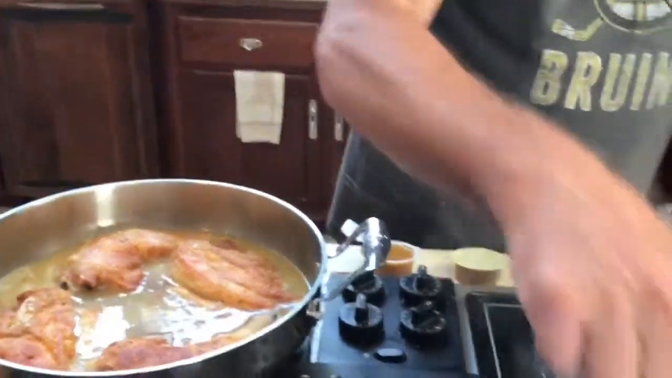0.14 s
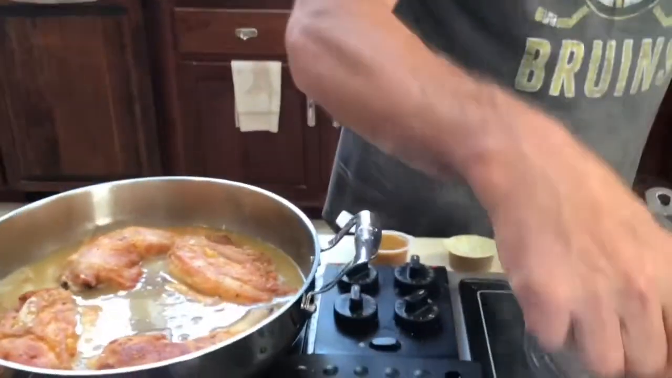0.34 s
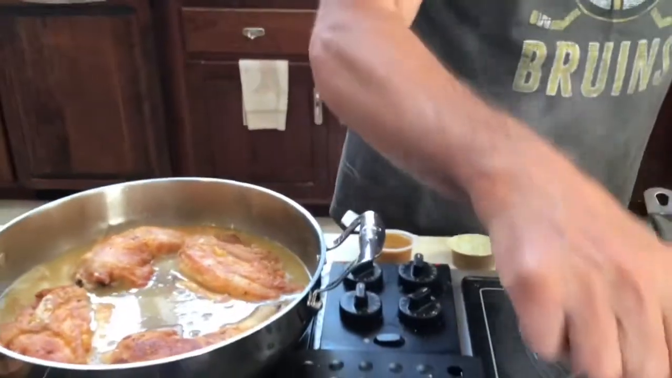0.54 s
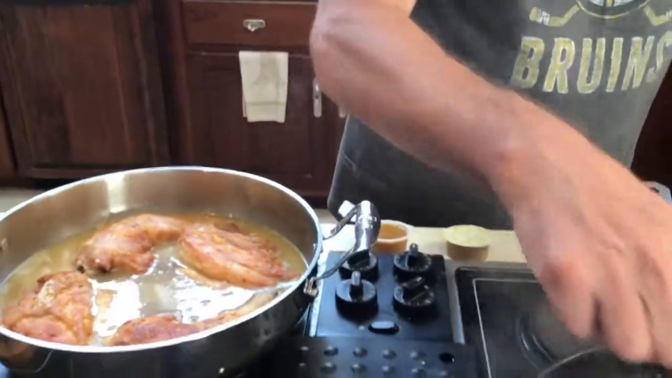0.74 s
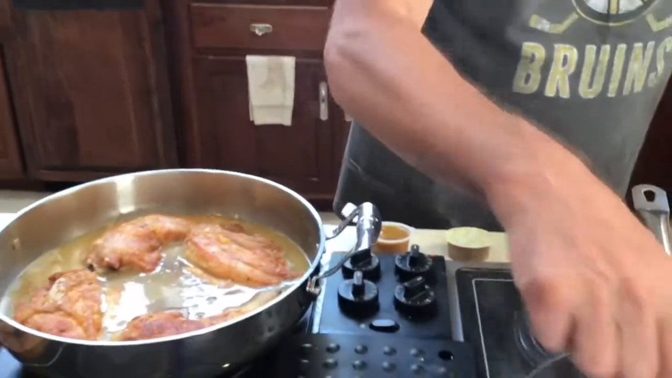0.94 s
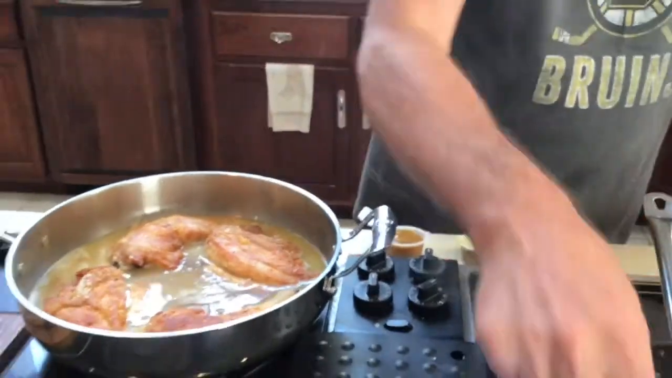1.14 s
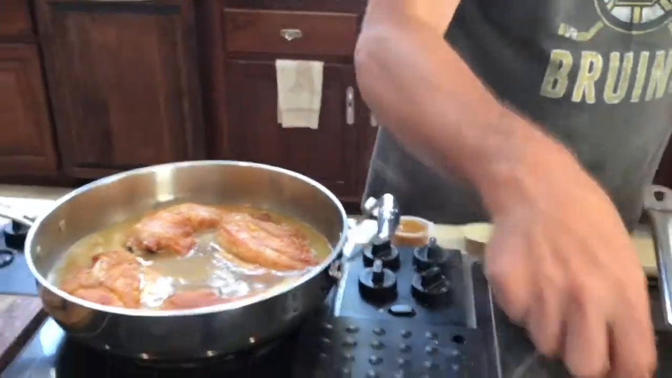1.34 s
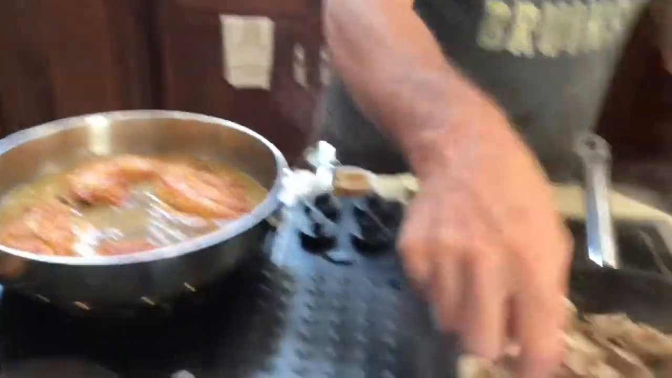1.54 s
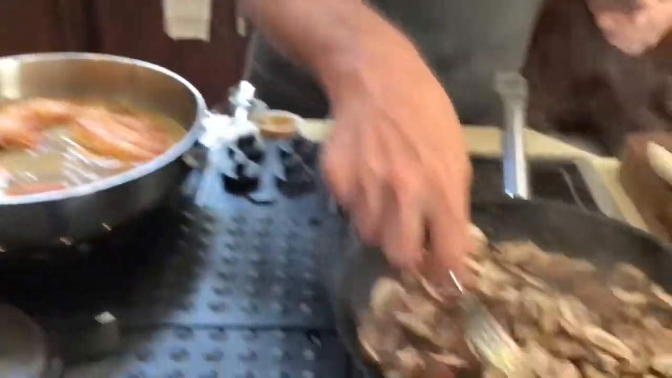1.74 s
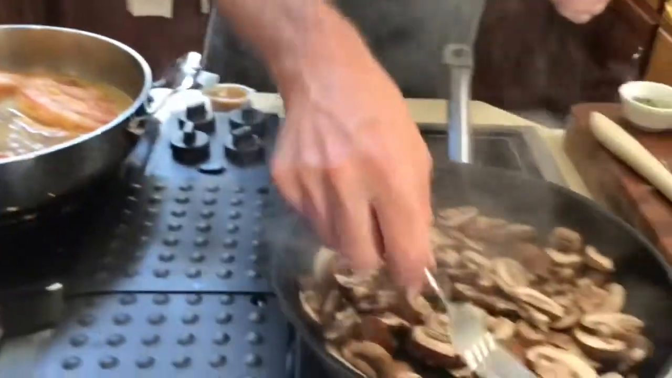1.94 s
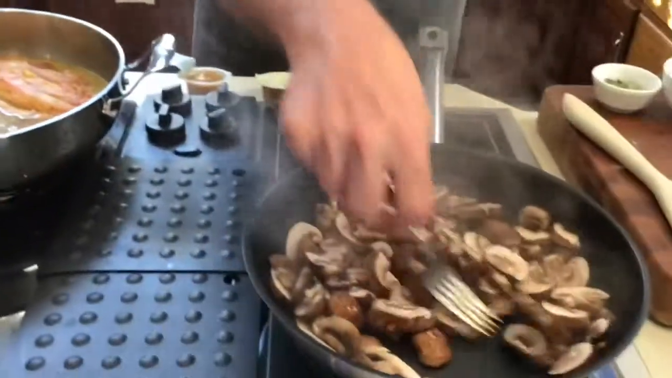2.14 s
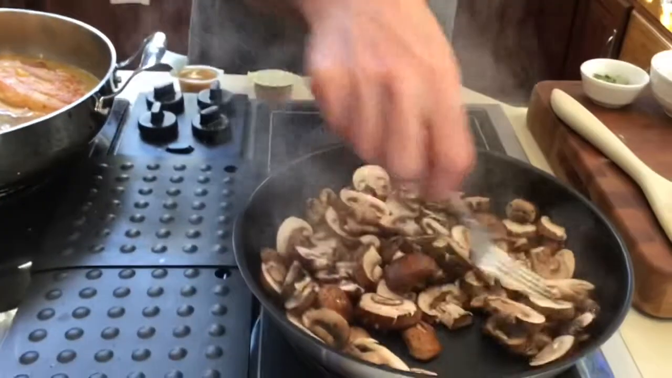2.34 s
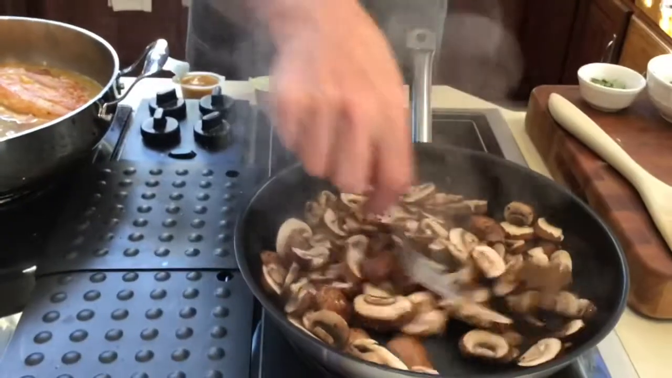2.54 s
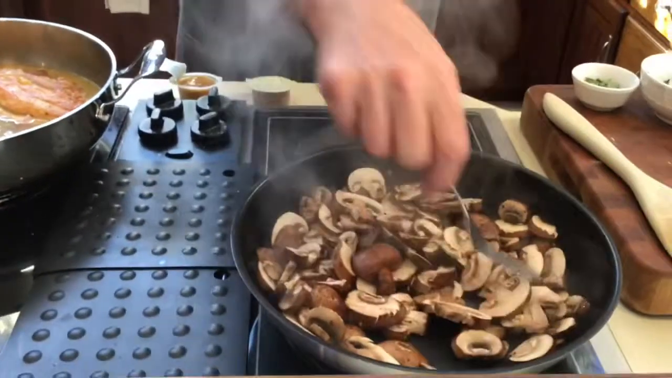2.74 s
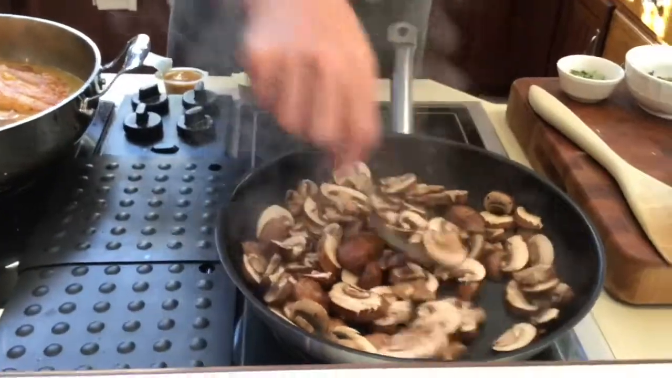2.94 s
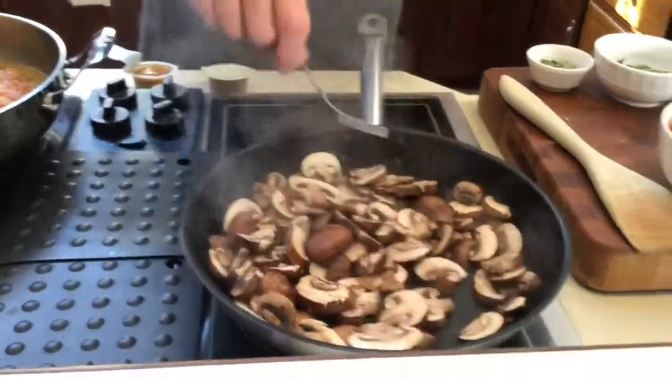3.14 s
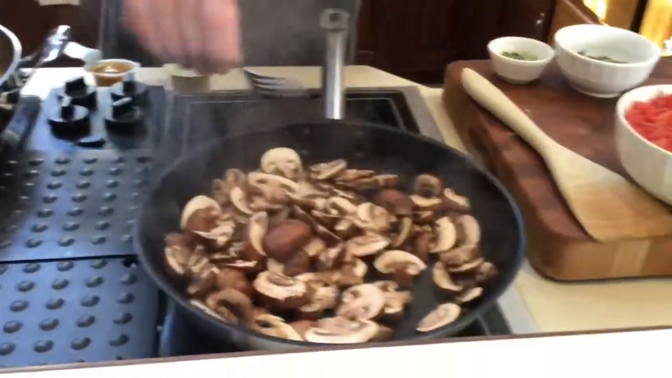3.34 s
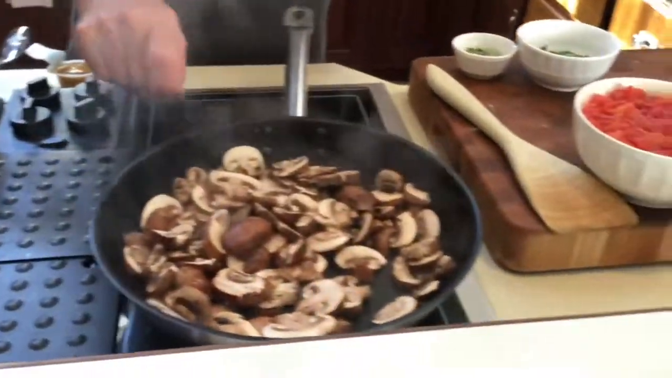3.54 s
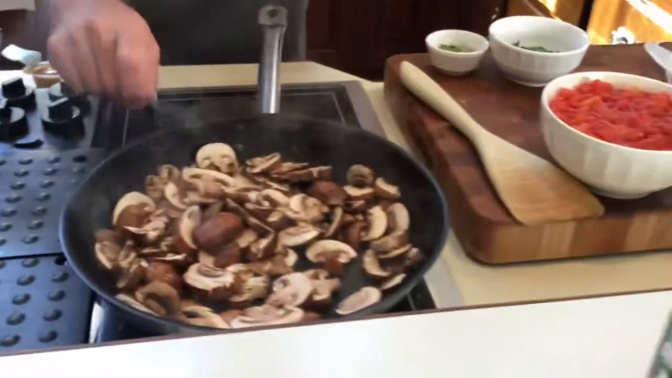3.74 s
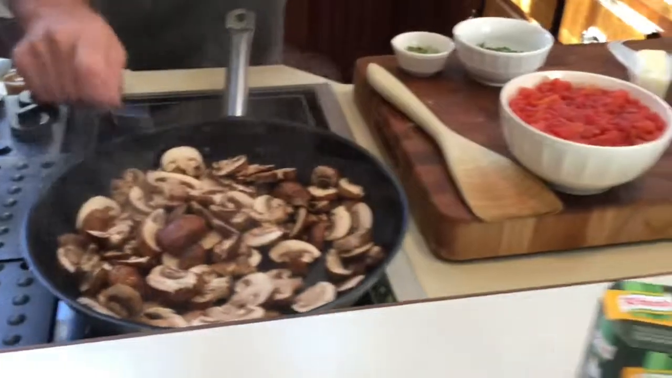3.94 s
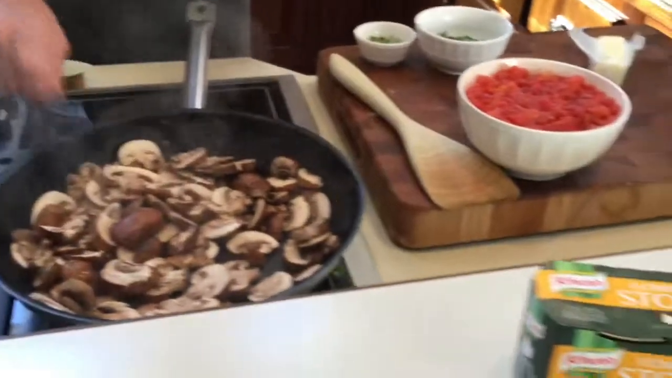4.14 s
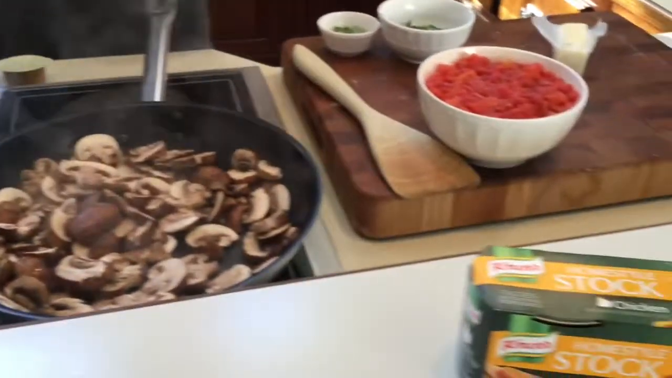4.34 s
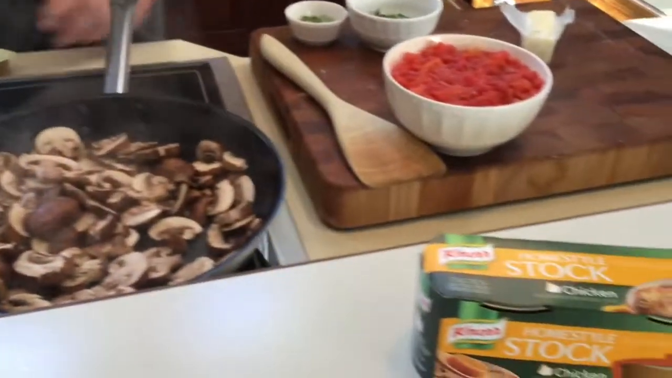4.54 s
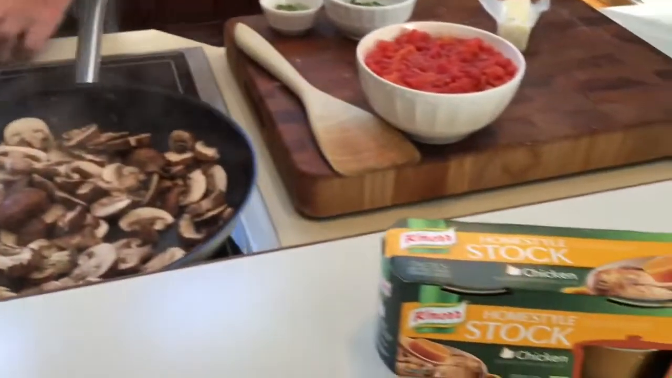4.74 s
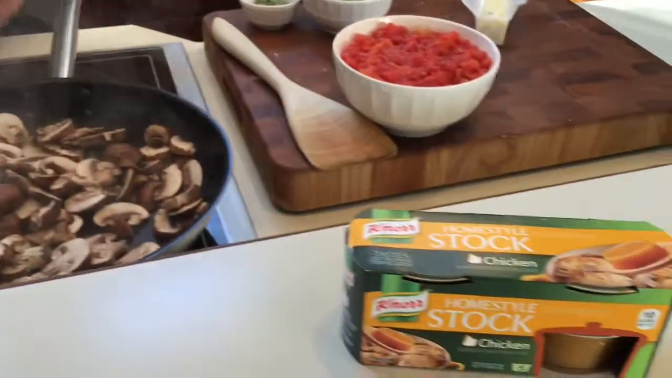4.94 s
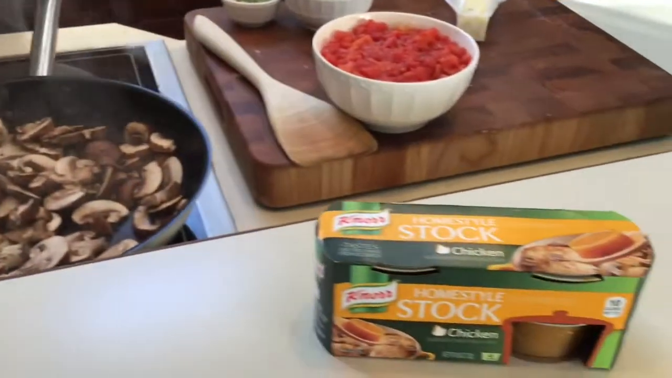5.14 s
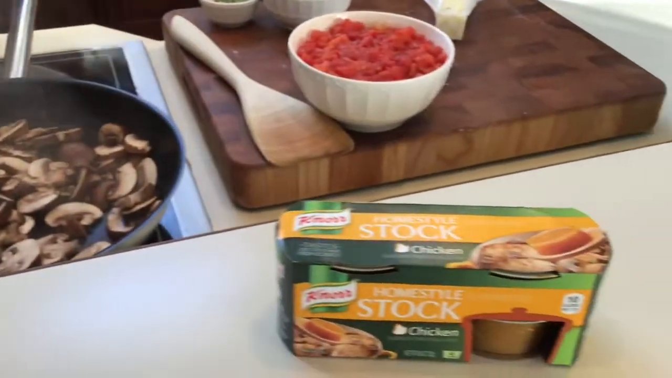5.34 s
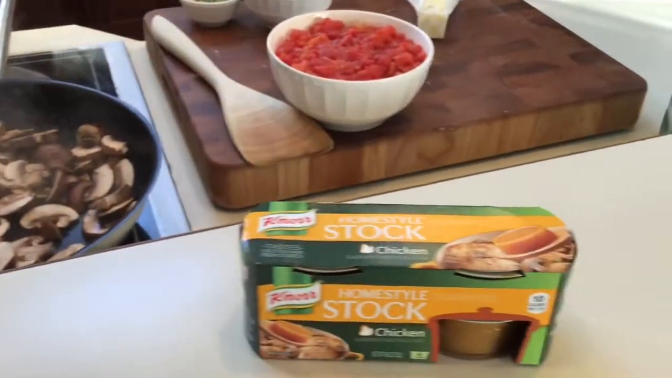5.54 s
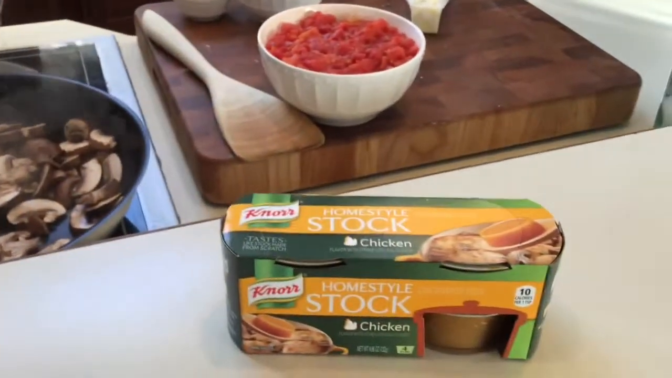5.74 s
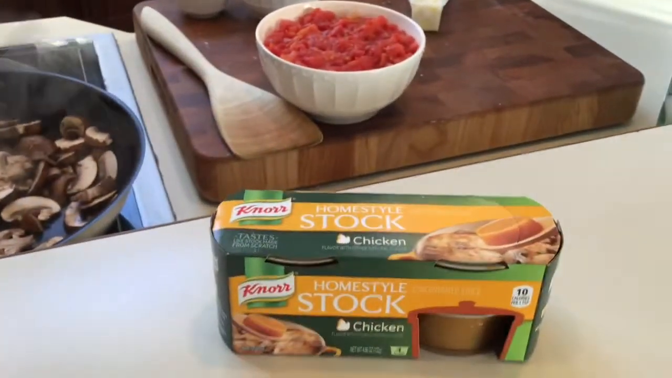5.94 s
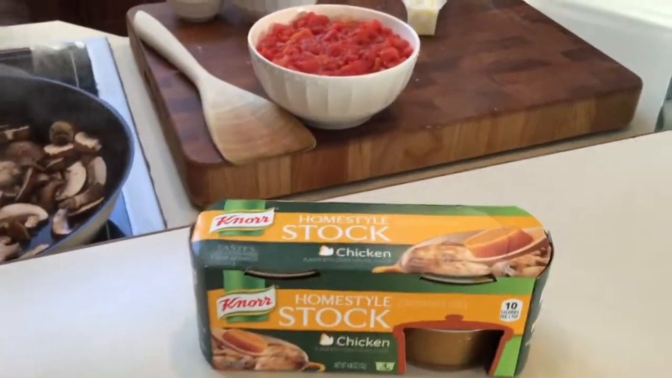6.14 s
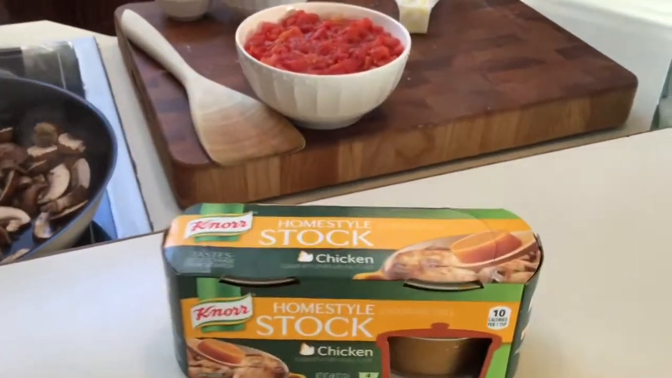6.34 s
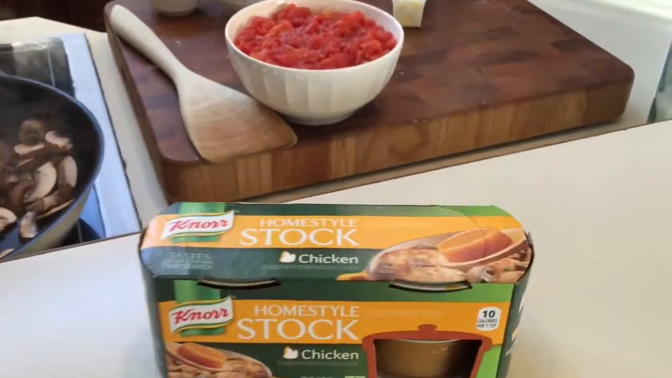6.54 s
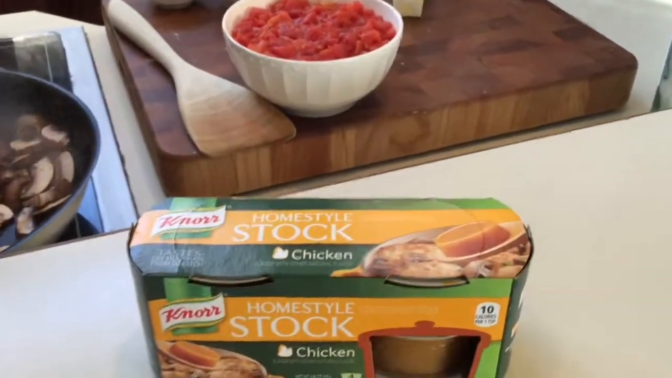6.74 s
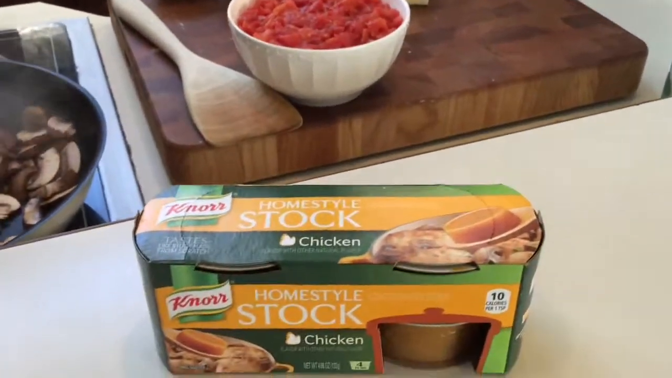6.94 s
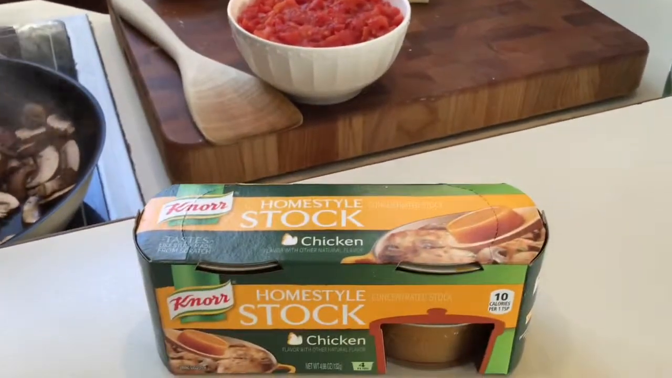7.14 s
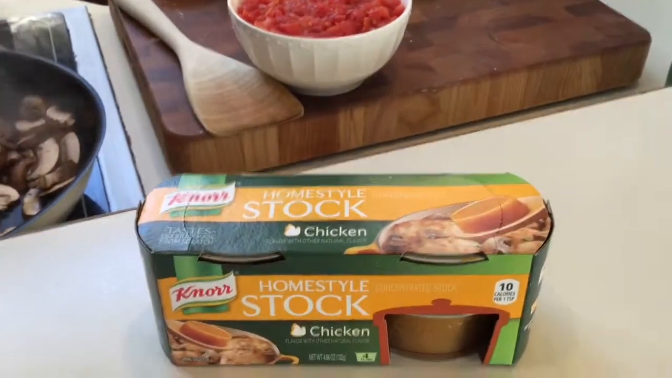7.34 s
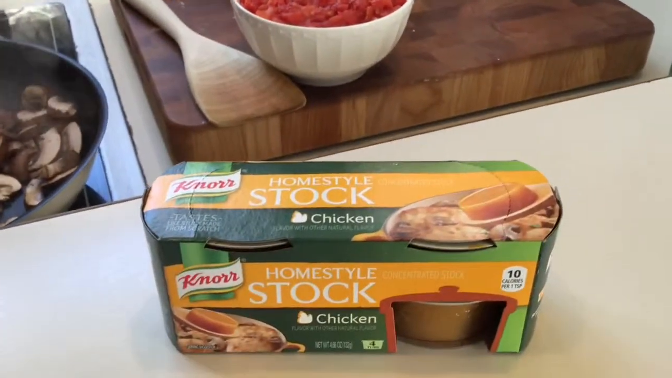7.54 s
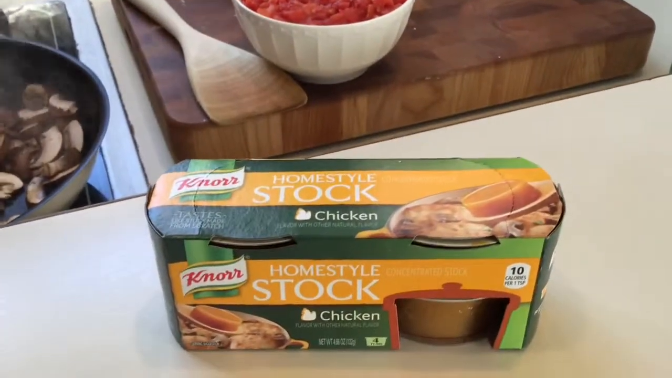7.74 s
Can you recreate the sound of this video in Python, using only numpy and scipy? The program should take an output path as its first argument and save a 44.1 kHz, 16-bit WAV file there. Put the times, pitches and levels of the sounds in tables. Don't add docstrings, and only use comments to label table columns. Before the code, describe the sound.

Mushrooms sizzle and spit in a frying pan, gradually receding, with four sharp ringing fork knocks on the rim midway and faint floor creaks.

```python
import sys
import numpy as np
from scipy import signal
from scipy.io import wavfile
from scipy.ndimage import uniform_filter1d

SR = 44100
rng = np.random.default_rng(int(sys.argv[2]) if len(sys.argv) > 2 else 0)


def store_pcm(level_fs):
    pcm = np.round(np.clip(level_fs, -1, 1) * 32767).astype(np.int16)
    wavfile.write(sys.argv[1], SR, np.atleast_2d(pcm).T)


def convert_level_to_amplitude(level_db):
    exponent = np.asarray(level_db, float) / 20
    return 10 ** exponent


N = 348390
TIME = np.arange(N) / SR

# [t/s, level/dB]
FRYING_LEVEL = [(0, -34.5), (.54, -35), (.8, -36.5), (1.36, -37.5), (1.6, -38.5), (2.0, -38.5),
                (2.4, -38.5), (2.8, -38.5), (3.5, -41), (4.4, -43), (5.0, -44), (5.7, -44.5), (6.2, -45),
                (7.9, -45)]
# [f/Hz, level per Hz/dB]
FIZZ_COLOUR = [(290, -55), (500, -20), (562, -14), (659, -14.5), (708, -17.5), (1020, -13.5), (1090, -11.5),
               (1530, -8.5), (4730, -6), (7100, -3.5), (8090, -1.5), (8960, -1), (11800, -15), (15100, -23),
               (16000, -20)]
# [level when near/dB, share of the fading it follows]
FIZZ_ZONES = [(11.5, 0.82), (14.5, 0.97), (15, 1), (16, 1.01), (18.5, 0.59)]
# [f/Hz, level per Hz/dB]
HUM_COLOUR = [(18, -34), (30, -8.5), (52, -18), (86, -6.5), (178, 0), (276, -6), (337, -3.5), (394, -7.5),
              (509, -13.5), (563, -14.5), (900, -25.5), (1170, -48), (1980, -120)]
# [level at rest/dB, swell/dB, centre t/s, width/s]
DRONE_SWELL = (-76.5, 5, 6.9, 1.5)
# [t/s, peak level/dB, wet part level/dB]
FAT_SPITS = [(0.1301, -18, -28), (0.184, -20, -15), (0.5025, -8, -15), (0.5804, -13.5, -17),
             (0.6784, -25, -19), (0.7064, -13, -19), (0.7417, -22, -17), (0.7633, -16, -24),
             (0.7875, -15, -19), (0.8114, -17.5, -22), (0.8704, -16, -28), (0.9825, -14, -5),
             (1.2774, -19, -16), (1.2925, -20, -21), (1.558, -17, -19), (1.863, -19, -11),
             (1.9634, -18, -19), (2.3214, -16, -19), (2.7938, -15, -26), (3.2555, -18, -24),
             (3.399, -15.5, -19), (4.5063, -26, -26), (5.2774, -22.5, -13), (5.681, -23, -27),
             (5.7195, -22, -13), (6.5184, -25, -19), (6.7244, -39, -19), (6.8753, -26, -19),
             (7.6226, -28, -11), (7.7284, -34, -19)]
# [t/s, hold/s, level/dB]
BOARD_RUBS = [
    (1.316, 0.043, -48.5),
    (1.44, 0.018, -53.5),
    (1.55, .02, -61),
    (1.7, 0.13, -54.5),
    (1.747, 0.017, -60),
    (5.313, 0.054, -46),
    (5.414, 0.013, -50),
    (5.496, 0.06, -48.5),
    (5.697, 0.1, -48),
]
# [f/Hz, width/Hz, level/dB]
BOARD_MODES = [(125, 18, -9), (183, 16, 0), (243, 22, -3), (290, 30, -9)]
# [t/s, hold/s, level/dB]
FLOOR_GROAN = (3.11, 0.076, -53)
# [t/s, level/dB, f/Hz, t60/s]
SOFT_THUMPS = [
    (0.47, -47, 80, .08),
    (1.738, -39, 780, 0.018),
    (1.74, -45, 158, 0.2),
    (1.742, -48, 443, 0.095),
]
# [t/s, level/dB, f/Hz, t60/s]
WET_POPS = [
    (6.655, -37, 3300, .02),
    (6.725, -36, 3270, .02),
    (7.626, -34, 2280, 0.0095),
    (7.731, -37, 3250, .02),
    (7.731, -38, 2600, .015),
    (7.757, -35, 3000, .012),
    (6.837, -40, 3600, .012),
]
KNOCK_TIMES = [3.5385, 3.7376, 3.9265, 4.1366]
# [peak level/dB, clatter t60/s, chatter length/s, thud level/dB, deep push level/dB]
KNOCK_BLOWS = [
    (-3.5, 0.069, 0.0027, -6, -39),
    (-5.5, 0.079, 0.0053, -11, -43),
    (-5.5, 0.075, 0.0029, -11, -56),
    (-5.5, 0.065, 0.014, -10, -57),
]
# [f/Hz, level per Hz/dB]
CLATTER_COLOURS = [
    [(88, -26), (150, -4), (774, -14), (1060, 0.5), (1480, -10), (1660, 12), (1940, -24), (2180, -2),
     (2810, -1.5), (4410, -18.5), (5570, 0), (6140, -9), (8900, 2.5), (16000, -24)],
    [(88, -32), (150, -18), (601, -2.5), (1480, -7), (1720, -4), (3840, -18.5), (4580, -22), (6390, -1),
     (7320, -16), (8730, 1.5), (10200, -4.5), (11900, -21), (14800, -20), (16000, -30)],
    [(88, -34), (150, -25), (637, 3), (888, -11), (1060, 1), (1340, -12), (1720, 3), (1870, -29),
     (2600, -11), (4320, -29), (5460, 0.5), (6390, -13), (8900, -2.5), (16000, -28)],
    [(88, -25), (150, -10), (475, -21), (612, -5), (1190, -10), (1390, -2.5), (1690, -5), (1830, -12),
     (2270, -12), (3700, -20), (3920, -45), (4410, -12), (7470, -4.5), (16000, -22)],
]
# [f/Hz, level per Hz/dB]
ECHO_COLOUR = [(35, -44), (60, -16), (178, 5.5), (589, -1), (672, -1.5), (735, -2), (1560, 0), (1710, -2.5),
               (3710, -6.5), (9000, 2), (12000, -52), (15600, -58), (22000, -120)]
# [f/Hz, t60/s]
ECHO_T60 = [(100, 0.47), (700, 0.83), (4000, 0.41), (13000, 0.68)]
HOB_NOTES = [88, 173, 205, 254, 340, 358, 490, 672]
WALL_NOTES = [1055, 1103, 1303, 1724, 1895, 2024, 2184, 2338, 2587]
RIM_NOTES = [4043, 4247, 5060, 5297, 5465, 5608, 6464, 7348, 8978]
# [t60/s, level in knock 1, 2, 3, 4/dB]
HOB_RINGING = [(0.32, -33, -34, -38, -36), (0.24, -24, -20, -22.5, -22), (0.093, -39, -41, -24, -12),
               (0.17, -33.5, -23, -21, -47), (0.26, -36, -31.5, -30, -26.5), (0.15, -17, -22, -22.5, -24),
               (0.34, -37, -39, -36, -40), (0.48, -33, -37, -34.5, -35)]
WALL_RINGING = [(0.3, -40, -41, -39, -41), (0.47, -38, -36, -39, -39), (0.43, -34, -45, -40, -40),
                (0.45, -24.5, -26.5, -29.5, -42), (0.69, -38, -54, -53, -52), (0.6, -35, -43, -45, -43),
                (0.054, -5.5, -43, -26, -21.5), (0.67, -31, -77, -58, -57), (0.12, -25, -33, -33, -44)]
RIM_RINGING = [(0.17, -31, -48, -39, -34), (0.6, -52, -44, -57, -44), (0.17, -25, -33, -40, -36),
               (0.4, -37, -40, -37, -39), (0.39, -35, -42, -35, -30), (0.31, -32, -33, -36, -35),
               (0.16, -24, -24, -31, -28), (0.14, -27, -36, -29, -23), (0.058, -14, -25, -34, -19)]

NEAR_DB = -36
TURN_S, TURN_LOSS_DB = 4.5, 5
OFF_AXIS_S, OFF_AXIS_DB = (1.35, 3.3), 6
FLOOR_DB, FLOOR_FOLLOWS = -58, 0.48
SPIT_HZ, SPIT_SPREAD_HZ = 8600, 430
SPIT_TOP_HZ, SPIT_TRIM_DB = 11500, -1.5
CLICK_DECAY_S = .0006
CREAK_ATTACK_S, CREAK_T60_S = 0.012, 0.23
GROAN_ATTACK_S, GROAN_T60_S = 0.023, 0.24
GROAN_HZ, GROAN_DROP_HZ, GROAN_SAG_S = 104, 27, 0.05
POP_SHORTEN, POP_LIFT_DB = .5, 2.0
# (detune share, dB) for hob and wall, and for the crowded rim
TWIN, RIM_TWINS = (.008, -13), (.016, -5)


def rms_one(x):
    return x / np.sqrt(np.mean(x ** 2) + 1e-20)


def at_hz(points, hz):
    f, values = np.transpose(points)
    return np.interp(np.log(hz), np.log(f), values)


def cut(x, hz, kind, order=2):
    return signal.sosfilt(signal.butter(order, hz, kind, fs=SR, output="sos"), x)


def bands(edges, order=2):
    return [(np.sqrt(low * high), signal.butter(order, [low, high], "band", fs=SR, output="sos"))
            for low, high in zip(edges, edges[1:])]


def drift(rate):
    r = np.exp(-80 * np.pi * rate / SR)
    slow = signal.lfilter([1], [1, -2 * r, r * r], rng.standard_normal(N // 40 + 2002))
    slow = slow[2000:]
    return np.interp(np.arange(N) / 40, np.arange(len(slow)), rms_one(slow))


def ring(clicks, hz, t60):
    r, w = convert_level_to_amplitude(-60 / (t60 * SR)), 2 * np.pi * hz / SR
    return signal.lfilter([0, np.sin(w)], [1, -2 * r * np.cos(w), r * r], clicks + 1e-18)


def stroke(s, hold, db, attack, t60):
    release_s = np.maximum(TIME - s - attack - hold, 0)
    return np.clip((TIME - s) / attack, 0, 1) * convert_level_to_amplitude(db - 60 * release_s / t60)


def fading():
    return np.interp(TIME, *np.transpose(FRYING_LEVEL)) - NEAR_DB


def bursts(per_s, spread_db):
    sizes = convert_level_to_amplitude(spread_db * np.minimum(rng.exponential(1, N), 4.6)) * rng.choice([-1, 1], N)
    return rms_one(sizes * (rng.random(N) < per_s / SR))


def sizzle():
    fade_db = fading()
    zones = [db + follows * fade_db for db, follows in FIZZ_ZONES]
    zones[2] = zones[2] - TURN_LOSS_DB * np.clip((TIME - TURN_S) / 0.017, 0, 1)
    zones[4] = zones[4] - np.interp(TIME, OFF_AXIS_S, [0, OFF_AXIS_DB])
    crackle = bursts(900 * convert_level_to_amplitude(3.0 * drift(8.2)), spread_db=4.0)
    hiss = [bursts(12000, spread_db=3.5) for k in range(2)]
    together, out = drift(10.7), 0
    edges = np.r_[np.geomspace(480, 3600, 10), np.arange(4340, 11100, 740),
                  12200, 13400, 14600, 15400, 17000]
    for k, (hz, band) in enumerate(bands(edges, order=4)):
        level_db = zones[np.searchsorted([3600, 5820, 8040, 11000], hz)]
        if hz < 5820:
            level_db = zones[0] + np.interp(hz, [3100, 4000], [0, 1]) * (zones[1] - zones[0])
        share = np.interp(np.log(hz), np.log([500, 3000, 9000, 15000]), [.15, 0.3, 0.45, 0.5])
        share = share * convert_level_to_amplitude(.25 * fade_db)
        grains = signal.sosfilt(band, hiss[k % 2] + share * crackle)
        wander_db = .5 * together + 1.03 * drift(25)
        out = out + grains * convert_level_to_amplitude(at_hz(FIZZ_COLOUR, hz) + level_db + wander_db)
    return convert_level_to_amplitude(-41.5) * out


def room_floor():
    white = rng.standard_normal((3, N))
    hum = 0
    for k, (hz, band) in enumerate(bands(np.geomspace(45, 900, 16))):
        hum = hum + convert_level_to_amplitude(at_hz(HUM_COLOUR, hz) + 1.34 * drift(5.5)) * signal.sosfilt(band, white[k % 2])
    drone = rms_one(cut(white[2], [36, 60], "band"))
    rest_db, swell_db, s, width = DRONE_SWELL
    drone_db = rest_db + swell_db * np.exp(-((TIME - s) / width) ** 2)
    return convert_level_to_amplitude(FLOOR_DB + FLOOR_FOLLOWS * fading()) * rms_one(hum) + convert_level_to_amplitude(drone_db) * drone


def spits():
    out, t = np.zeros(N), np.arange(400) / SR
    click_decay = np.exp(-t / CLICK_DECAY_S)
    for s, db, wet_db in FAT_SPITS:
        hz = SPIT_HZ + SPIT_SPREAD_HZ * rng.standard_normal()
        crack, splash = rng.standard_normal((2, 400))
        snap = 1.13 * cut(crack * click_decay, 10200, "low", order=4)
        snap = snap + np.sin(2 * np.pi * hz * t) * np.exp(-t * hz / 2.7)
        if s > TURN_S:
            snap = snap - (1 - convert_level_to_amplitude(-TURN_LOSS_DB - 10.0)) * cut(snap, [5500, 8000], "band", order=1)
        wet = convert_level_to_amplitude(wet_db + 5.5) * cut(splash * click_decay, [2000, 4200], "band")
        spit = cut(cut(snap, 5000, "high"), SPIT_TOP_HZ, "low") + wet
        at = round(s * SR)
        out[at:at + 400] += convert_level_to_amplitude(db + SPIT_TRIM_DB) * spit / np.abs(spit).max()
    return out


def floorboards():
    rubbing = sum(stroke(*row, CREAK_ATTACK_S, CREAK_T60_S) for row in BOARD_RUBS)
    slips = bursts(900, spread_db=-2.5) * rubbing
    wood = sum(convert_level_to_amplitude(db) * np.sqrt(width) * ring(slips, hz, 2.5 / width) for hz, width, db in BOARD_MODES)
    out = convert_level_to_amplitude(-42) * cut(wood, [135, 330], "band", order=4)
    groan_hz = GROAN_HZ + GROAN_DROP_HZ * np.exp(-np.maximum(TIME - FLOOR_GROAN[0], 0) / GROAN_SAG_S)
    groan = stroke(*FLOOR_GROAN, GROAN_ATTACK_S, GROAN_T60_S) * np.sin(2 * np.pi * np.cumsum(groan_hz) / SR)
    out = out + np.sqrt(2) * groan
    pops = [(s, db + POP_LIFT_DB, hz, POP_SHORTEN * t60) for s, db, hz, t60 in WET_POPS]
    for s, db, hz, t60 in list(SOFT_THUMPS) + pops:
        click = 1. * (np.arange(N) == round(s * SR))
        out = out + convert_level_to_amplitude(db) * ring(click, hz, t60)
    return out


def twinned(blow, hz, t60):
    on_rim = hz in RIM_NOTES
    detune, db = RIM_TWINS if on_rim else TWIN
    low, high, sign = rng.uniform([-1, .3, -1], [-.3, 1, 1])
    twins = ring(blow, hz * (1 + detune * low), t60)
    if on_rim:
        twins = twins + ring(blow, hz * (1 + detune * high), t60)
    return ring(blow, hz, t60) + np.sign(sign) * convert_level_to_amplitude(db) * twins


def knocks():
    out, size = np.zeros(N), round(.5 * SR)
    t = TIME[:size]
    blow = 1. * (t == 0)
    bank = bands(np.geomspace(110, 16500, 36))
    notes_hz = list(HOB_NOTES) + list(WALL_NOTES) + list(RIM_NOTES)
    ringing = list(HOB_RINGING) + list(WALL_RINGING) + list(RIM_RINGING)
    for k, (s, (db, clatter_t60, chatter, thud_db, push_db)) in enumerate(zip(KNOCK_TIMES, KNOCK_BLOWS)):
        white, knock = rng.standard_normal((2, size)), np.zeros(size)
        early = convert_level_to_amplitude(-60 * np.maximum(t - chatter, 0) / max(clatter_t60, .02)) + convert_level_to_amplitude(8.5 - 60 * t / 0.0043)
        for j, (hz, band) in enumerate(bank):
            clatter = convert_level_to_amplitude(at_hz(CLATTER_COLOURS[k], hz) - 4.5) * early
            echo = convert_level_to_amplitude(at_hz(ECHO_COLOUR, hz) - 19.5 - 60 * t / at_hz(ECHO_T60, hz))
            echo = echo * (1 - np.exp(-t / 0.012))
            knock += convert_level_to_amplitude(db) * signal.sosfilt(band, white[j % 2] * (clatter + echo))
        until = KNOCK_TIMES[k + 1] - s if k < 3 else 1.
        damped = convert_level_to_amplitude(-60 * np.maximum(t - until, 0) / 0.088)
        for hz, (t60, *strength_db) in zip(notes_hz, ringing):
            swell = 1 - np.exp(-t * hz / 7.3)
            knock += convert_level_to_amplitude(strength_db[k]) * swell * damped * twinned(blow, hz, t60)
        thud = convert_level_to_amplitude(thud_db) * ring(blow, 1160, 0.012)
        push = convert_level_to_amplitude(push_db) * ring(blow, 60, 0.074)
        at = round(s * SR)
        out[at:at + size] += cut(knock + thud, 79, "high", order=4) + cut(push, 41, "high", order=4)
    return out


def scene():
    return np.tile(sizzle() + room_floor() + spits() + floorboards() + knocks(), (2, 1))


def band_limit(x):
    return signal.sosfilt(signal.butter(12, 16780, fs=SR, output="sos"), x)


def record(dry):
    heard = np.clip(cut(dry, 39, "high", order=4), -1, 1)
    steep = signal.ellip(12, .3, 70, 15850, fs=SR, output="sos")
    below = signal.sosfilt(steep, heard)
    above = cut(heard, [15900, 16500], "band", order=4)
    loud = uniform_filter1d(np.abs(heard), size=256) > .12
    kept = cut(above * loud, [15800, 16600], "band", order=4)
    return band_limit(below + convert_level_to_amplitude(-11) * kept)


dry = scene()
out = record(dry)
store_pcm(out)
```